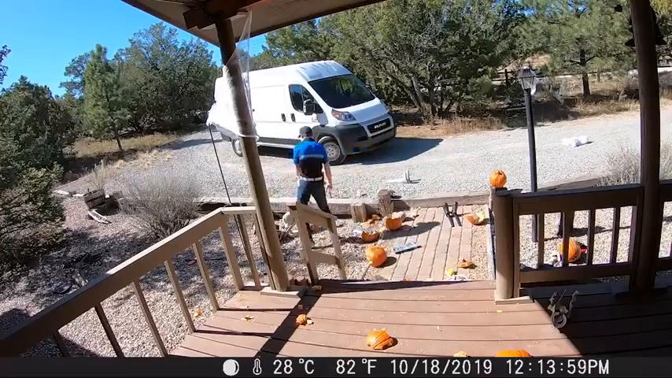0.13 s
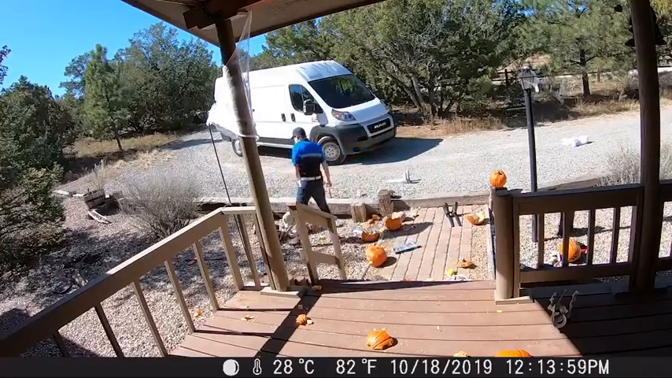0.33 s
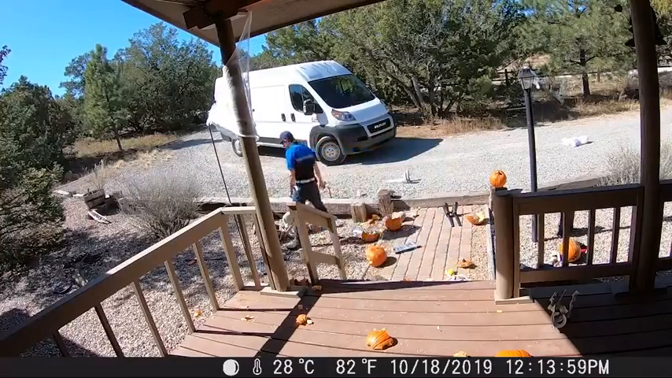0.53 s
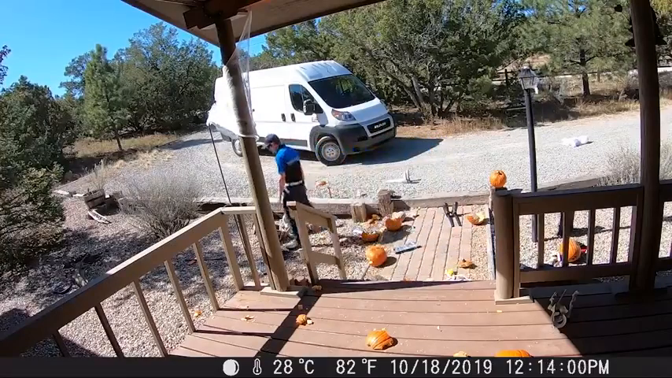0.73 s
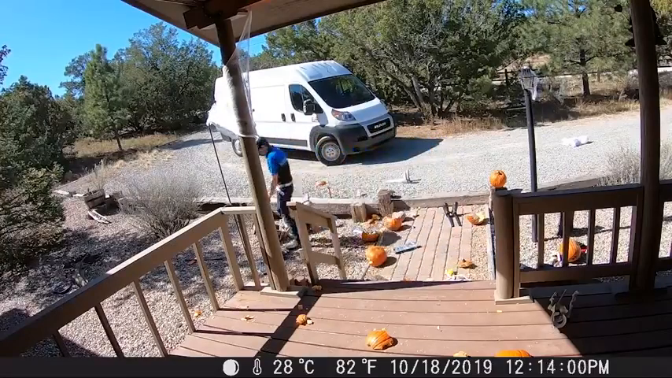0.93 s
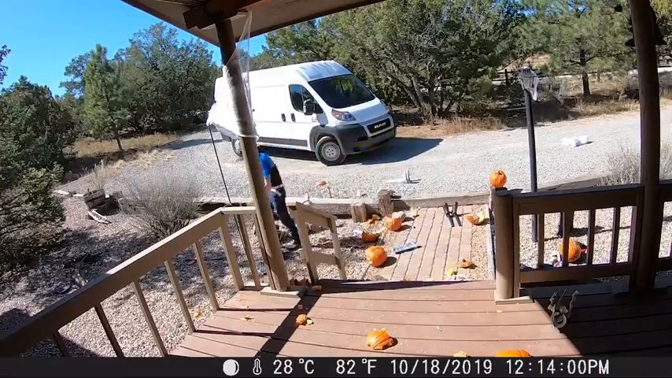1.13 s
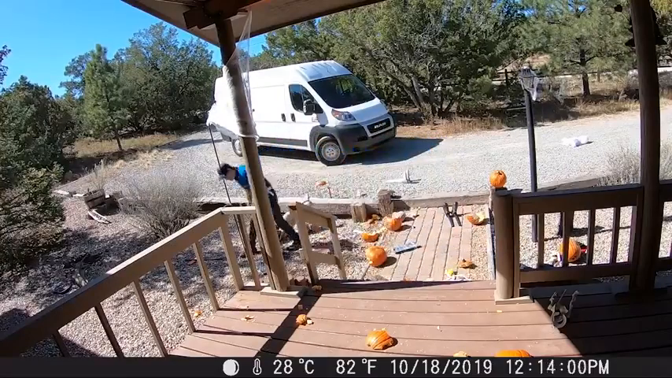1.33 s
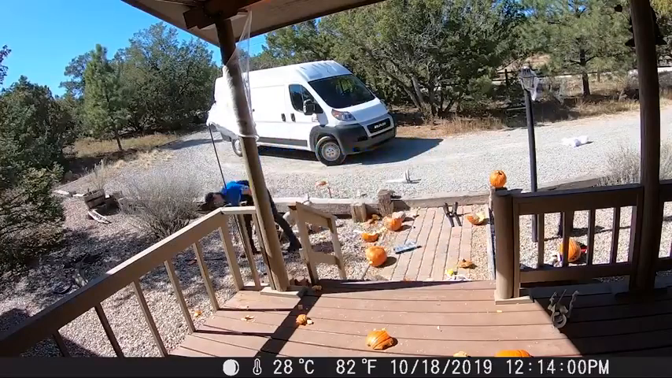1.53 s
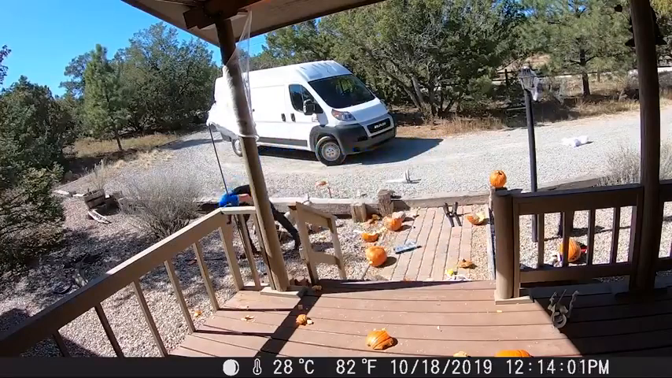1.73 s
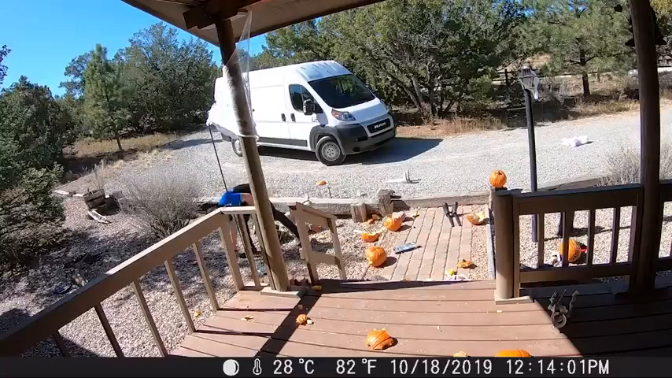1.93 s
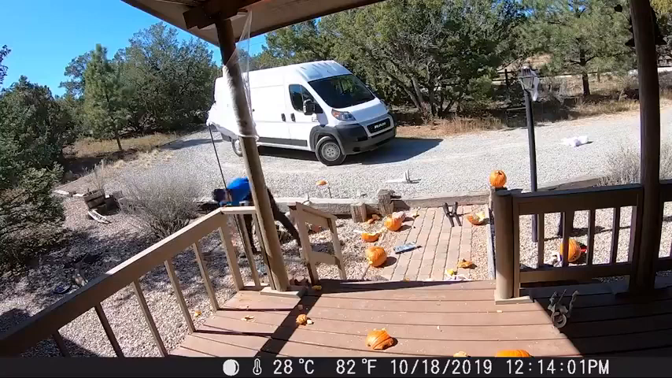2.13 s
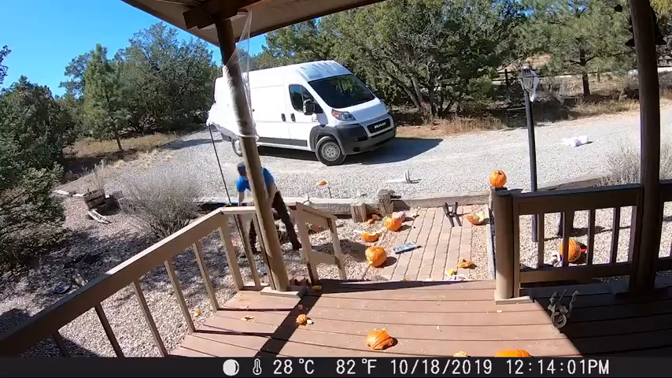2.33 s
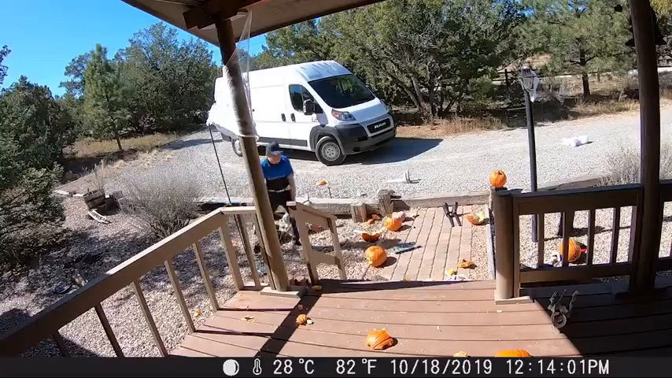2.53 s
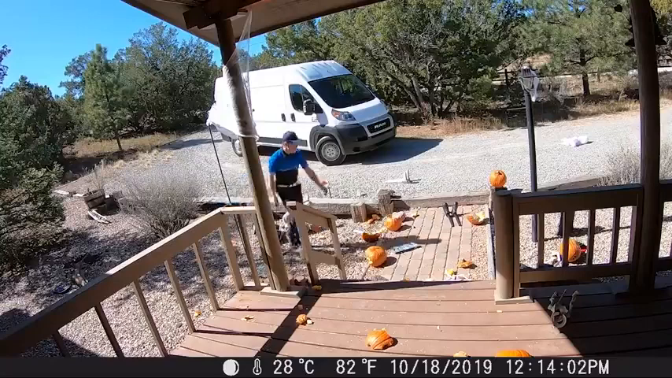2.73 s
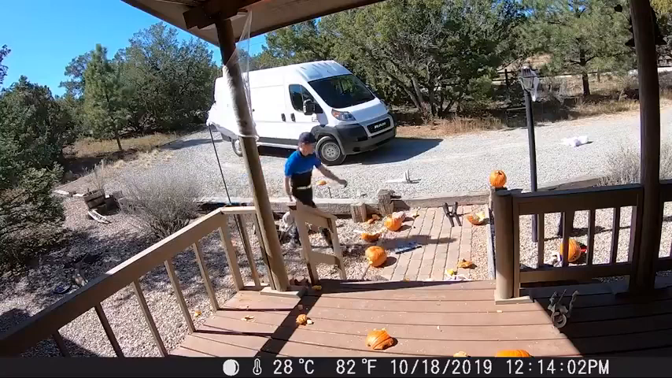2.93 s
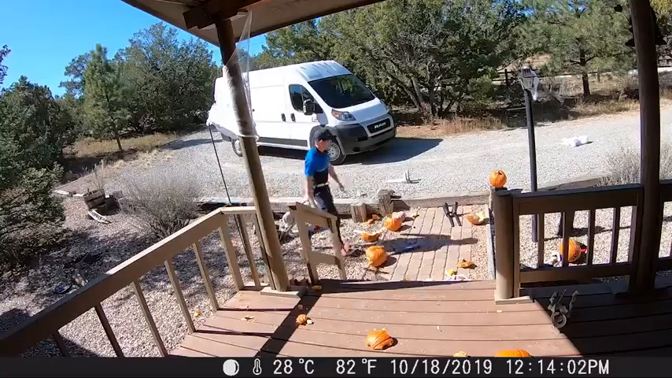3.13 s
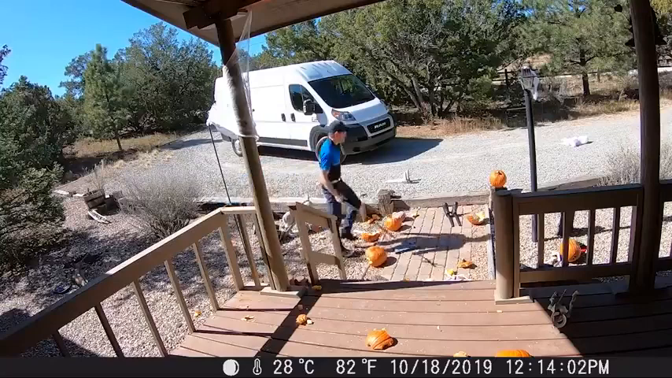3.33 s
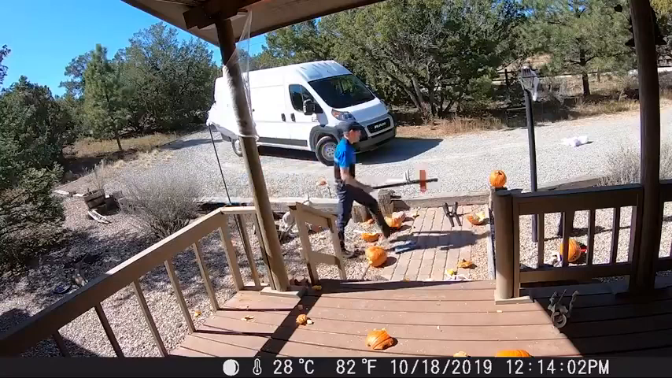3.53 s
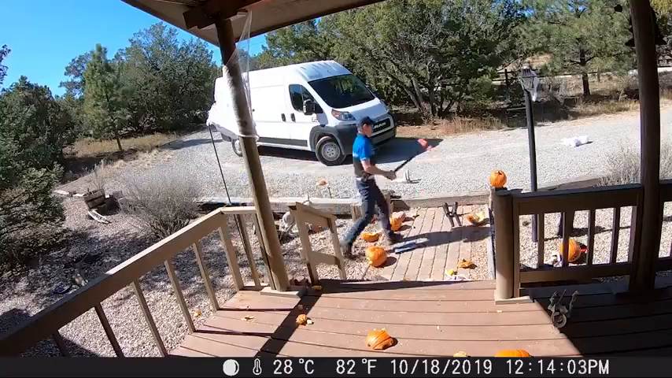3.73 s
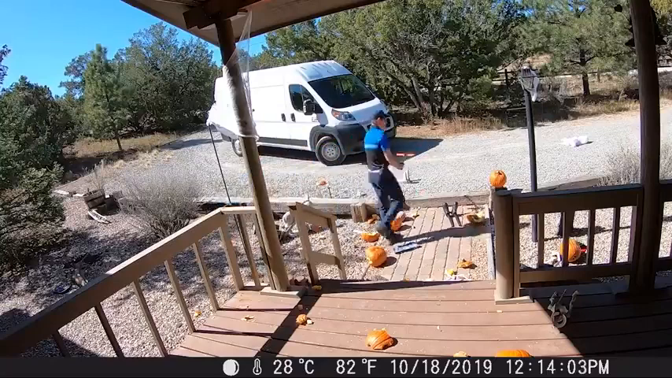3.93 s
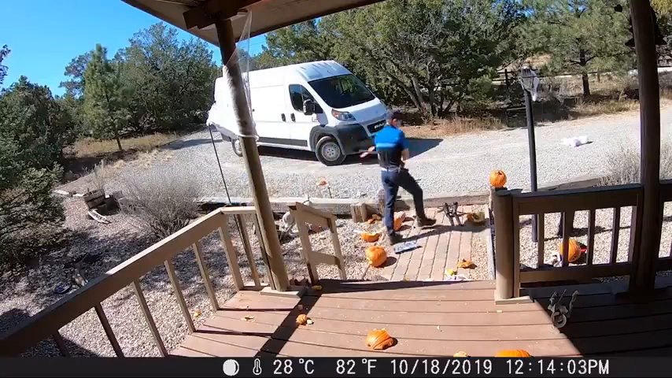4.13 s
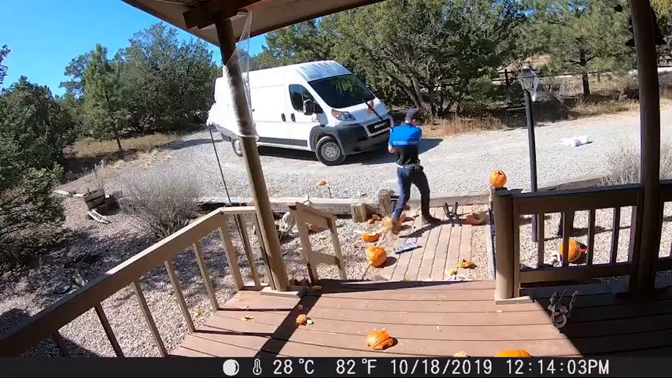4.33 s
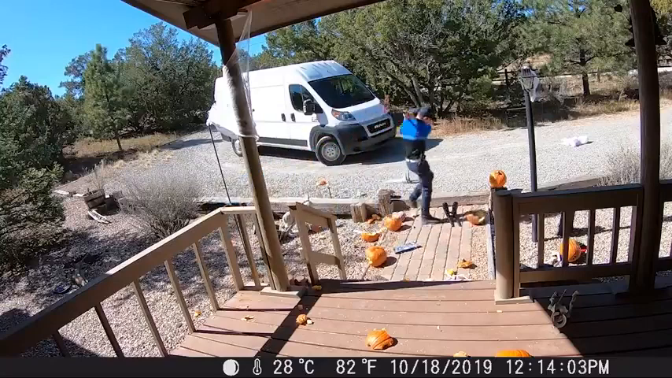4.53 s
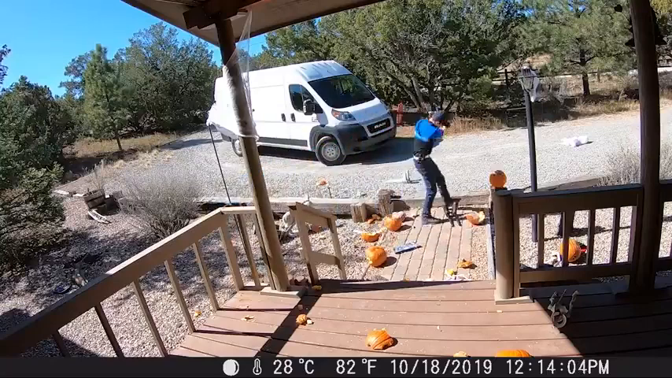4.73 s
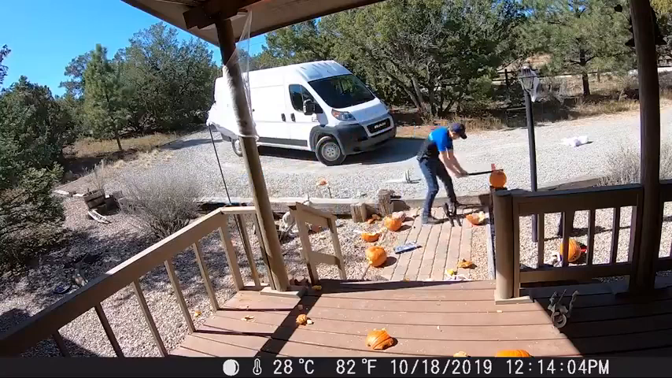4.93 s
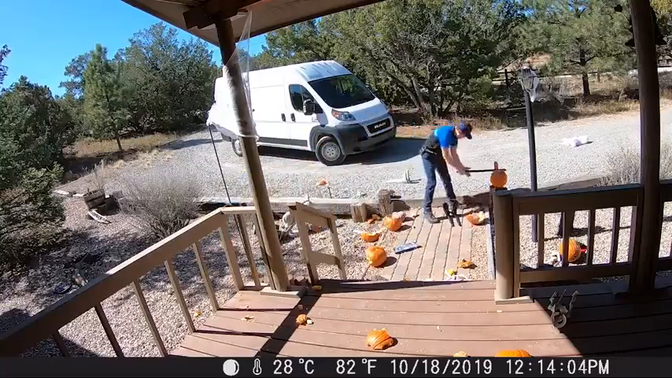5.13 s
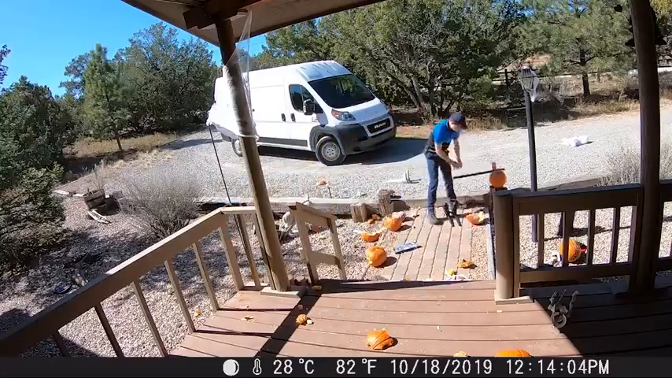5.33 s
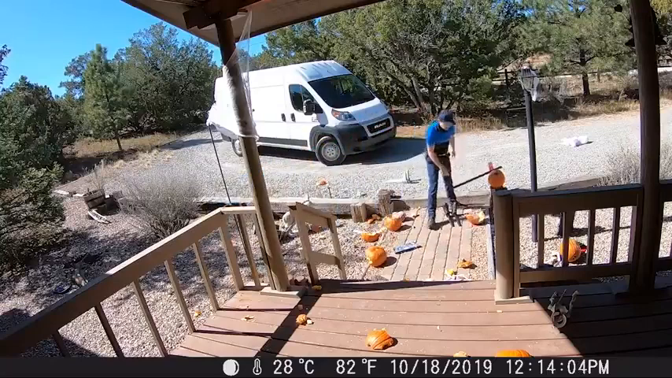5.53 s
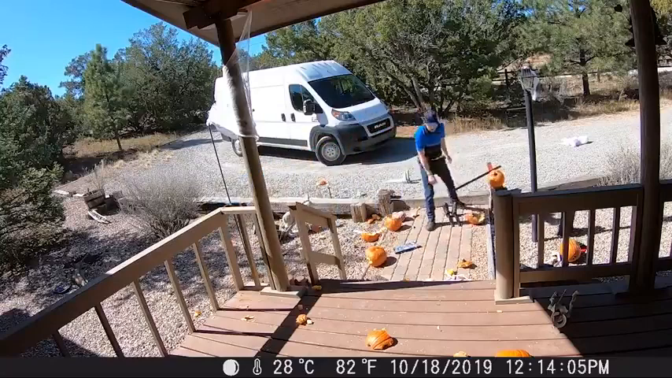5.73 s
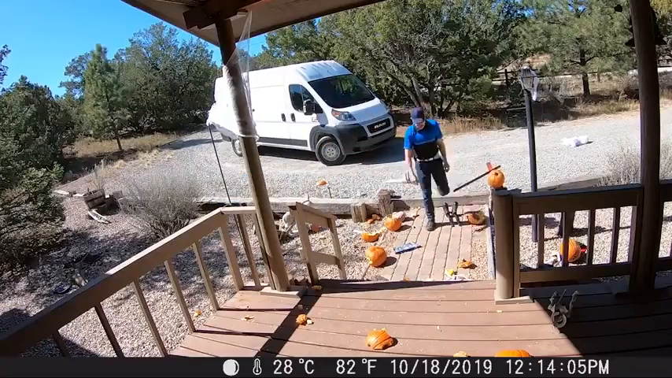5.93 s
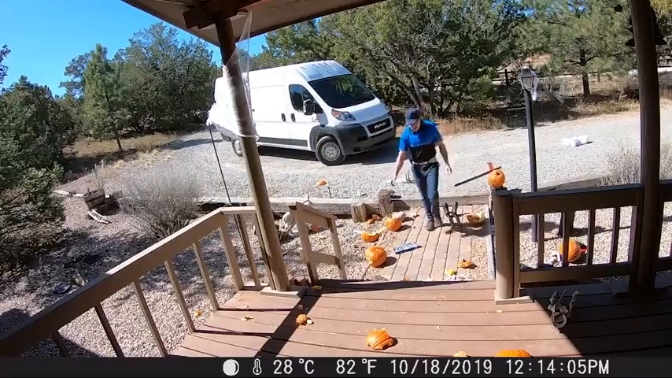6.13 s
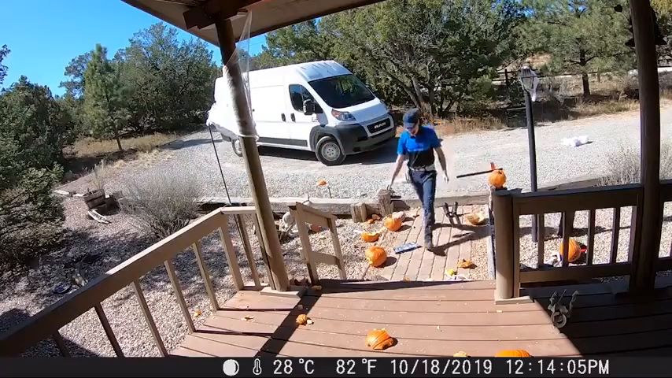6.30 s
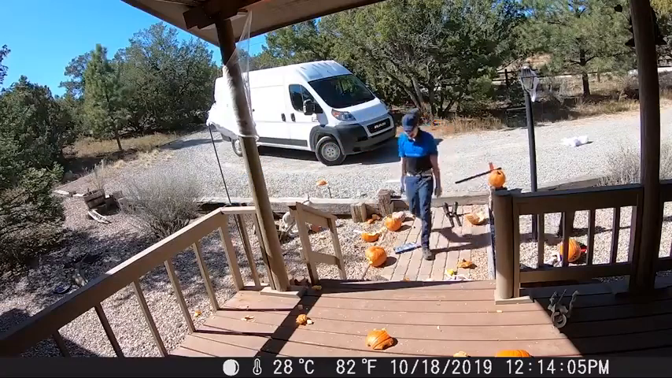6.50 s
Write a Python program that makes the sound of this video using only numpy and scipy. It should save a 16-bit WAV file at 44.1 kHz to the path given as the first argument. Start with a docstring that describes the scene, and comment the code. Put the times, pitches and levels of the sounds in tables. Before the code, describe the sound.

A fixed stereo camera microphone on a porch picks up a steady, fluttering low engine hum and soft outdoor air. Someone shuffles on gritty boards and paving: dry scuffs, stone crunches, hollow heel knocks, the strongest just before three seconds. Near five seconds a blade strikes a wooden post, a loud crack with a deep thump and short yard echo, followed by only very faint shuffling.

```python
"""A van's idle throbs nearby while gritty soles scuff, crunch and knock on boards and paving by a wooden
porch; at about 5 s a hatchet is driven into a post with one bang. Two ports pick it up in stereo.
Hum: beating sines. Air: shaped noise with resonant panels. Soles: noise grains and snapping stones.
Boards, post and blade: decaying modes; crack: shaped noise. Echo: sparse random taps."""
import sys
import numpy as np
from scipy import signal
from scipy.fft import rfft, irfft, next_fast_len
from scipy.io import wavfile
from scipy.ndimage import uniform_filter1d

SR = 44100
rng = np.random.default_rng(int(sys.argv[2]) if len(sys.argv) > 2 else 0)


def store_pcm(level_fs):
    """Save levels as 16-bit WAV."""
    pcm = np.round(np.clip(level_fs, -1, 1) * 32767).astype(np.int16)
    wavfile.write(sys.argv[1], SR, np.atleast_2d(pcm).T)


N = 289516


def amp(db):
    """Gain of a level in dB."""
    return 10 ** (np.asarray(db) / 20)


def evened(x):
    """Scales to rms 1."""
    return x / np.sqrt(np.mean(x ** 2) + 1e-20)


def read(points, hz):
    """Reads a spectrum table on a log-frequency axis."""
    f, value = np.transpose(points)
    return np.interp(np.log(hz + 1), np.log(f + 1), value)


def colour(x, points):
    """Filters by a spectrum table (frequency [Hz], gain [dB])."""
    size = next_fast_len(x.shape[-1])
    gain = amp(read(points, np.fft.rfftfreq(size, 1 / SR)))
    return irfft(rfft(x, size) * gain, size)[..., :x.shape[-1]]


def resonate(x, hz, width_hz):
    """One-pole complex resonance, gain about 1 at its centre."""
    pole = np.exp((2j * np.pi * hz - np.pi * width_hz) / SR)
    return 2 * signal.lfilter([1 - abs(pole)], [1, -pole], x).real


def add(mix, start_s, sound):
    """Lays a sound into the mix, cut at the end."""
    part = mix[..., round(start_s * SR):][..., :sound.shape[-1]]
    part += sound[..., :part.shape[-1]]


def ring(modes, seconds, weight_db=0, freedom=1):
    """Sum of dying sines after one tap, peak 1; freedom stretches the decays."""
    hz, db, t60_s = np.transpose(modes)[:, :, None]
    t = np.arange(round(seconds * SR)) / SR
    decay = amp(db + weight_db - 60 * t / (t60_s * freedom))
    out = (decay * np.sin(2 * np.pi * hz * t)).sum(0)
    return out / abs(out).max()


def damped(sound, rise_s, hold_s, left):
    """A ring swells, runs freely, then the settling weight damps it to a small share; peak 1."""
    t = np.arange(len(sound)) / SR
    swell = 1 - np.exp(-t / rise_s)
    grip = left + np.exp(-(np.maximum(t - hold_s, 0) / 0.0025) ** 2)
    out = sound * swell * grip
    return out / abs(out).max()


LOWER_ORDER_HZ, BEAT_HZ = 37.984, 4.913  # the upper order lies BEAT_HZ above the lower
UPPER_DB, OUTER_DB = -0.5, -26  # orders against the lower one
IN_STEP_S = 0.14  # orders align here, before lateness
HUM_LEFT_DB, HUM_LEFT_LAG_CYCLES = -13, 0.32
# lower engine order at the right port: (time [s], peak level [dB])
HUM_LEVEL = [(0.13, -34.5), (0.32, -49), (0.52, -29), (0.74, -30), (1.05, -36.5), (1.36, -31.5),
             (1.56, -39.5), (1.77, -30), (1.96, -43), (2.16, -34), (2.56, -34.5), (2.78, -31),
             (2.97, -27.5), (3.37, -45.5), (3.58, -33), (3.9, -38.5), (4.18, -30.5), (4.6, -40.5),
             (4.8, -35), (5.2, -35), (5.41, -31), (5.63, -34.5), (6.03, -42.5), (6.44, -31)]
# hunting idle shifts the throb: (time [s], lateness [ms])
THROB_LATE = [(0.05, 31), (0.4, -26), (1.25, 0), (1.5, 12), (2.04, -15), (2.44, -22), (2.85, -18),
              (3.3, -8), (3.73, 8), (4.06, -53), (4.3, -1), (5.2, -21), (5.55, 8), (6.35, -22)]


def idle():
    """Two close engine orders, with a weak one on either side, beat about five times a second."""
    t = np.arange(N) / SR
    late_s = np.interp(t, *np.transpose(THROB_LATE)) / 1e3
    beat = np.exp(2j * np.pi * BEAT_HZ * (t - IN_STEP_S - late_s))
    orders = 1 + amp(UPPER_DB) * beat + amp(OUTER_DB) * (1 / beat + beat ** 2)
    swing = amp(np.interp(t, *np.transpose(HUM_LEVEL))) * orders
    left_port = amp(HUM_LEFT_DB) * np.exp(-2j * np.pi * HUM_LEFT_LAG_CYCLES)
    ports = np.array([[left_port], [1]])
    hum = (ports * swing * np.exp(2j * np.pi * LOWER_ORDER_HZ * t)).imag
    throb = abs(swing) / abs(swing).max()
    return hum, throb


AIR_MID_DB, AIR_SIDE_DB = -55.5, -57  # wash rms
# engine wash and outdoor air, sum of ports: (frequency [Hz], relative density [dB per Hz])
AIR_MID = [(38, -63), (65, -33), (103, -5.5), (182, 2.5), (204, 1.5), (309, 1), (338, -18), (511, -9.5),
           (688, -15), (771, -9.5), (970, -31), (1280, -15), (1720, -14.5), (7450, -34), (11000, -47),
           (15500, -75)]
# the same, difference of ports: (frequency [Hz], relative density [dB per Hz])
AIR_SIDE = [(38, -64), (65, -18), (86, -15.5), (182, -13), (371, -15.5), (416, -19), (455, -29),
            (672, -17.5), (771, -24.5), (1340, -25), (3750, -43.5), (6640, -45), (11000, -53), (15500, -78)]
# panels shaken by the engine: (frequency [Hz], width [Hz], level in the sum before throb [dB])
DRONES = [(28.3, 11.7, -53.5), (60.3, 9.5, -54.5), (84, 15, -65.5), (173.3, 3.1, -59), (223.3, 7.1, -75.5),
          (302, 1.8, -63), (471, 16, -63.5), (522.4, 8.5, -67.5)]


def air(throb):
    """Noise wash, patchy in time and pitch; the noise-driven panel resonances breathe with the engine."""
    frames, hz = N // 256 + 5, np.fft.rfftfreq(1024, 1 / SR)
    re, im = rng.standard_normal((frames, 513, 2, 2)).T
    patches = uniform_filter1d(rng.standard_normal((frames, 513)).T, 10, 0)
    patches = evened(uniform_filter1d(patches, 14, 1))
    gusts = evened(uniform_filter1d(rng.standard_normal(frames), 40))
    density_db = np.array([read(AIR_MID, hz), read(AIR_SIDE, hz)])[..., None]
    spectrum = (re + 1j * im) * amp(density_db + 1.7 * patches + 0.7 * gusts)
    mid, side = signal.istft(spectrum, nperseg=1024, noverlap=768)[1][:, :N]
    out = np.array([amp(AIR_MID_DB) * evened(mid), amp(AIR_SIDE_DB) * evened(side)])
    for f, width_hz, db in DRONES:
        panel = evened(resonate(rng.standard_normal((2, N)), f, width_hz))
        out += amp([[db], [db - 3.5]]) * panel * (0.59 + 0.5 * throb)
    return out


SLIDE_S, SLIDE_DB = 6.41, -67
# faint rasp of a sliding sole: (frequency [Hz], width [Hz], relative level [dB])
SLIDE = [(1390, 100, 3), (1750, 260, 2), (2110, 130, 3.5), (2520, 380, -3.5), (3300, 440, -9)]


def slide():
    """A sole slides near the end: noise through a few bands, swelling in."""
    t = np.arange(N - round(SLIDE_S * SR)) / SR
    rub = rng.standard_normal((2, len(t)))
    bands = 0
    for hz, width_hz, db in SLIDE:
        twice = resonate(resonate(rub, hz, width_hz), hz, width_hz)
        bands = bands + amp(db) * evened(twice)
    out = np.zeros((2, N))
    add(out, SLIDE_S, amp(SLIDE_DB) * bands * np.minimum(t / 0.049, 1))
    return out


def stones(per_s, cycles, count):
    """Small stones of many sizes snap at random moments, each ringing a few cycles at its own pitch."""
    out, t = np.zeros((2, N)), np.arange(600) / SR
    for hz in np.geomspace(900, 12000, count):
        strength = amp(3.4 * np.minimum(rng.exponential(1, N), 4))
        snaps = strength * (rng.random(N) < per_s / count / SR)
        phase = [[0], [2 * np.pi * rng.random()]]
        tone = np.exp(-t * hz / cycles) * np.sin(2 * np.pi * hz * t + phase)
        out += signal.oaconvolve(snaps[None], tone * hz / 3000, axes=1)[:, :N]
    return evened(out)


# colour of grit, for scuffs and crunches: (frequency [Hz], relative density [dB per Hz])
GRIT = [(530, 5.5), (900, -25), (1200, 1), (1500, -13), (1800, -3.5), (1950, -1.5), (2540, -4.5),
        (4390, -6.5), (6120, 8.5), (7150, 8.5), (9500, -5), (15500, -17)]
# dragging soles: (peak time [s], fine fizz level [dB], rise over 20 dB [s], fall over 20 dB [s],
# coarse rasp over fizz [dB], board rumble over fizz [dB])
SCUFFS = [(0.005, -52.5, 0.068, 0.15, -11, 0), (0.198, -61.5, 0.0074, 0.17, -8, -5),
          (0.42, -73, 0.024, 0.021, 9, -15), (0.645, -49, 0.031, 0.14, -3, 8),
          (0.92, -67, 0.42, 0.29, 3, 5.5), (1.36, -66.5, 0.25, 0.18, 3.5, 11),
          (1.426, -51, 0.041, 0.24, 0, 4), (1.51, -53.5, 0.19, 0.22, -11, 1.5),
          (1.68, -64, 0.039, 0.21, -10, 4.5), (1.753, -55.5, 0.027, 0.13, -1, 9),
          (1.97, -58, 0.19, 0.083, 0, 4.5), (2.07, -61.5, 0.11, 0.049, 5.5, 7.5),
          (2.14, -63, 0.064, 0.27, 8.5, 7.5), (2.374, -49, 0.048, 0.13, -2, 3),
          (2.598, -47, 0.091, 0.084, -12, -6.5), (2.73, -56, 0.027, 0.034, -17, -17),
          (2.825, -48, 0.031, 0.07, -3, 10), (3.0, -54.5, 0.54, 0.21, -24, 8),
          (2.86, -66, 0.037, 0.048, -4, 12), (3.179, -49, 0.083, 0.019, -14, 4.5),
          (3.103, -40, 0.12, 0.15, -22, 2.5), (3.43, -55, 0.46, 0.15, -4.5, 5),
          (3.579, -42.5, 0.064, 0.055, -19, 5), (3.782, -46, 0.17, 0.17, -18, 5.5),
          (4.05, -66.5, 0.68, 1, -4.5, 8), (4.32, -61.5, 0.083, 0.11, 2, 13.5),
          (4.403, -45.5, 0.089, 0.068, -7, 7), (4.52, -64, 0.065, 0.26, -3.5, 2),
          (5.886, -73.5, 0.21, 0.15, 6, 12), (6.236, -71.5, 0.072, 0.027, -1, 12.5),
          (6.5, -81, 0.083, .6, 16, 22.5)]


def scuffs():
    """Dense grains of grit under the sole: they fizz, rasp and rumble the boards, each with uneven grip."""
    t = np.arange(N) / SR
    sizes = (300, 500, 500, 900)
    grip = [evened(uniform_filter1d(rng.standard_normal(N), size)) for size in sizes]
    grains = rng.standard_normal((2, N)) + 0.53 * stones(1200, 5.3, count=30)
    grit = colour(grains, GRIT)
    above = signal.butter(4, 4700, "high", fs=SR, output="sos")
    below = signal.butter(4, 4700, fs=SR, output="sos")
    fizz = signal.sosfilt(above, grit) * amp(0.92 * grip[0] + 1.04 * grip[1])
    rasp = signal.sosfilt(below, grit) * amp(1.4 * grip[0] + 2.3 * grip[2])
    shaking = grains * amp(1.3 * grip[3])
    rumble = sum(amp(db) * resonate(shaking, hz, 53) for hz, db, _ in DECK[2:])
    power = np.zeros((3, N))
    for s, db, rise_s, fall_s, rasp_db, rumble_db in SCUFFS:
        drag_db = db - 20 * np.maximum((s - t) / rise_s, (t - s) / fall_s)
        power += amp([[0], [rasp_db], [rumble_db]]) ** 2 * amp(drag_db) ** 2
    return sum(np.sqrt(p) * evened(layer) for p, layer in zip(power, (fizz, rasp, rumble)))


# single crunches under a sole: (time [s], peak level [dB], pitch of the loudest stone [Hz],
# its share [dB], t60 [s], brightness [dB per octave])
CRUNCHES = [(0.627, -36.5, 5770, -3, .1, -5), (0.64, -39, 1500, 7, 0.14, -13),
            (0.858, -47, 6150, 0, 0.084, -4), (0.8853, -45.5, 6200, 6, .1, -6),
            (1.413, -42.5, 3660, 9, .1, -8), (1.677, -40, 6400, -4, 0.18, -11),
            (1.749, -45, 2310, 1, 0.056, -3), (1.7676, -33.5, 3600, -15, .06, -5.5),
            (1.979, -45.5, 1760, 1, 0.12, 1), (2.042, -47, 2100, 6, .08, -4),
            (2.065, -49, 4200, 2, .05, -4), (2.113, -40.5, 6300, 0, 0.045, -8),
            (2.1432, -40, 2530, 2, 0.088, -6), (2.238, -43, 2330, -2, 0.055, -4),
            (2.315, -44, 2380, -4, 0.066, -4), (2.3341, -32.5, 2370, -8.5, 0.11, -4.5),
            (2.5389, -37.5, 6300, -27, 0.088, -7.5), (2.731, -38, 6600, 11, 0.055, -7),
            (2.781, -30.5, 3200, -8.5, 0.16, -3.5), (2.8232, -29.5, 6160, -5, 0.13, -11),
            (2.842, -30, 3980, -8.5, 0.037, -9), (1.489, -46, 3000, -2, 0.061, -3),
            (1.529, -52, 6500, 0, .05, 3), (3.09, -39, 2500, -2, .05, 5),
            (2.911, -31.5, 6600, -14, 0.12, -9), (2.96, -36, 6270, -7, 0.096, -8.5),
            (3.018, -38.5, 6200, 10, 0.052, -5), (3.049, -31, 6560, -14, 0.19, -2),
            (3.118, -30, 6100, 4, 0.04, -13), (3.163, -34.5, 7100, -9, 0.16, 16),
            (3.334, -45, 6300, 12, 0.1, 6), (3.494, -34, 5900, -11, 0.082, -7),
            (3.5506, -33.5, 2820, -9, 0.052, 0), (3.573, -28.5, 6230, -3, 0.049, 4),
            (3.692, -40, 6300, -13, .1, -6), (3.779, -30.5, 2180, -6, 0.12, -3),
            (4.003, -42, 2240, 6, 0.079, -11), (4.127, -40, 1900, -12, 0.11, -10),
            (4.4, -34, 1840, -7, 0.23, 15)]


def crunches():
    """Grit gives way in short, grainy, dying noise bursts, with one stone resonating in each."""
    out, t = np.zeros((2, N)), np.arange(SR // 5) / SR
    for s, db, hz, stone_db, t60_s, tilt_db in CRUNCHES:
        burst = rng.standard_normal((2, len(t))) * amp(-60 * t / t60_s) * np.minimum(t / 0.0022, 1)
        grain = evened(uniform_filter1d(rng.standard_normal(len(t)), size=90))
        burst = burst * amp(2.25 * grain)
        tilt = [(1000, -2 * tilt_db), (16000, 2 * tilt_db)]  # four octaves
        spray = evened(colour(colour(burst, GRIT), tilt))
        crunch = spray + amp(stone_db) * evened(resonate(burst, hz, 0.13 * hz))
        add(out, s, amp(db) * crunch / abs(crunch).max())
    return out


OWN_DB, OWN_T60_S = 9, 0.32  # own note of the struck board, before damping
# deck modes, also rumbled by the scuffs: (frequency [Hz], relative level [dB], undamped t60 [s])
DECK = [(72.5, -14, 0.067), (106, 19, 0.18), (134, 4, 0.48), (162, -5, 0.21), (230, 2.5, 0.4),
        (257, 10.5, 0.32), (321, 14, 0.18), (373, -4.5, 0.036), (390, 7.5, 0.19), (412, 3.5, 0.74),
        (478, 1, 0.11), (590, -10, 0.12), (672, 10.5, 0.049), (745, 4.5, 0.27), (907, -13, 0.095),
        (1040, -20, 0.11)]


def board(hz, db_per_octave, rise_s, hold_s):
    """One board's own note and the deck modes around it, weaker with distance in pitch."""
    modes = DECK + [(hz, OWN_DB, OWN_T60_S)]
    near_db = -db_per_octave * abs(np.log2(np.transpose(modes)[0] / hz))[:, None]
    return damped(ring(modes, 0.42, near_db), rise_s, hold_s, 0.071)


# heels and toes on boards: (time [s], board peak level [dB], board pitch [Hz], free ring [s],
# clack pitch [Hz], clack over board [dB], thud over board [dB])
KNOCKS = [(0.629, -44, 370, 0.015, 685, 0.5, -6), (0.66, -39, 703, 0.014, 420, -13, -6),
          (1.412, -39.5, 426, 0.032, 754, -9, -11), (1.75, -34, 349, 0.035, 685, -14, -15),
          (1.7685, -39, 565, 0.014, 700, 5, -18), (1.973, -43.5, 880, 0.013, 870, -24, -26),
          (2.143, -54, 566, 0.022, 890, 5, -11), (2.394, -35.5, 339, 0.016, 807, -10, -7.5),
          (2.583, -35.5, 346, 0.027, 726, -25, -4.5), (2.742, -60, 397, .02, 690, -12, -6),
          (2.782, -23, 382.3, 0.022, 739, -12.5, -16), (2.825, -28.5, 706, 0.024, 300, 0.5, -1),
          (2.829, -25.5, 146, 0.0089, 1100, -18, -12), (2.917, -33.5, 427, 0.023, 733, -4, -5),
          (2.989, -38, 414, 0.03, 723, -7, -17), (3.018, -29.5, 416, 0.038, 990, -8, -13),
          (3.028, -36.5, 1093, 0.011, 703, 0, -9), (3.079, -37, 264, 0.03, 624, -15, -18),
          (3.113, -32.5, 329, 0.018, 747, -3, -15), (3.145, -38, 279, 0.012, 1140, -5, -18),
          (3.172, -41.5, 335, 0.021, 848, -5, -0.5), (3.553, -43, 394, 0.023, 784, 7, -12),
          (3.566, -33.5, 331, 0.035, 786, -2, -32), (3.707, -40.5, 373, 0.027, 649, -1, -58),
          (3.781, -32, 348, 0.019, 677, -2.5, -16), (3.819, -43, 290, 0.014, 704, 2, -1),
          (4.129, -44.5, 346, 0.042, 650, -10, -19.5), (4.311, -35.5, 357, 0.032, 680, -23, -23),
          (4.364, -32, 357, 0.014, 755, -28, -12), (4.375, -33, 385, 0.014, 1184, -9, -15),
          (4.399, -32, 277, 0.037, 695, -25, -7.5), (4.894, -37, 339, 0.036, 624, -17, -2),
          (4.952, -36.5, 440, 0.018, 640, -18, -6), (6.436, -47.5, 244, 0.02, 680, -22, 4.5)]


def steps():
    """Each step rings its board, a broader clack of deck modes at its own pitch, and the joists as a thud."""
    out, thud = np.zeros(N), board(152.2, 28.5, 0.0023, 0.022)
    for s, db, hz, hold_s, clack_hz, clack_db, thud_db in KNOCKS:
        knock = board(hz, 65, 0.00056, hold_s)
        clack = board(clack_hz, 14.0, 0.00054, hold_s)
        add(out, s, amp(db) * (knock + amp(clack_db) * clack))
        add(out, s, amp(db + thud_db) * thud)
    return out


# strike, bite, jolt and rebound of the hatchet: (time [s], blade level [dB], crack level [dB],
# crack t60 [s], thump level [dB], blade decay factor [ratio], free ring of post [s],
# pitch around which the post is struck [Hz], fall of its other modes [dB per octave])
BLOWS = [(5.028, -23, -14, 0.055, -18.5, 0.43, 0.027, 252, 4.5),
         (5.037, -32, -25.5, 0.15, -10.5, .4, 0.023, 260, 3.5),
         (5.068, -57, -43, 0.056, -23.5, 0.72, 0.026, 140, 7),
         (5.098, -57, -53, 0.07, -26, 0.72, 0.0267, 249, 24),
         (5.129, -27, -36, 0.032, -31, 0.93, 0.02, 207, 30)]
# blade modes: (frequency [Hz], relative level [dB], t60 before the decay factor [s])
BLADE = [(1420, -8, 0.055), (2444, 11, 0.078), (2700, 3, .05), (2930, 9, 0.03), (3220, 7, .022),
         (3630, 9, 0.035), (4730, 2, 0.03)]
# wood crack: (frequency [Hz], relative density [dB per Hz])
CRACK = [(410, -38), (700, -15), (950, -12), (1150, -9), (1400, 1), (1760, -8), (2490, -3.5), (3600, -16),
         (4300, -14), (4890, -9), (5700, -8), (7600, -14), (15500, -44)]
# railing post modes: (frequency [Hz], relative level [dB], undamped t60 [s])
POST = [(72, -11, 0.22), (104, -9, 0.14), (139.8, 3, 0.24), (174, -17, 0.15), (214, -4, 0.26),
        (254.6, 4.5, 0.18), (355, 7.5, 0.064), (417, -17, 0.095), (492, -2.5, 0.13), (616, -7, 0.045),
        (745, -7.5, 0.053), (1046, -13.5, 0.15), (1115, -19, 0.071)]


def hatchet():
    """A sharp crack while the heavy post starts to ring more slowly; apart from them, the thin blade ring."""
    wood, steel, t = np.zeros(N), np.zeros(N), np.arange(SR // 5) / SR
    onset = np.minimum(t / 0.0025, 1)
    for s, blade_db, crack_db, t60_s, thump_db, freedom, hold_s, post_hz, focus_db in BLOWS:
        crack = colour(rng.standard_normal(len(t)), CRACK) * amp(-60 * t / t60_s)
        near_db = -focus_db * abs(np.log2(np.transpose(POST)[0] / post_hz))[:, None]
        thump = damped(ring(POST, .4, near_db), 0.0055, hold_s, 0.051)
        add(wood, s, onset * amp(crack_db) * crack / abs(crack).max())
        add(wood, s, amp(thump_db) * thump)
        add(steel, s, onset * amp(blade_db) * ring(BLADE, len(t) / SR, freedom=freedom))
    return wood, steel


def smear(x):
    """Short random decaying noise filter: a blurred copy for the difference, giving stereo width."""
    taps = rng.standard_normal(400) * amp(-30 * np.arange(400) / 400)
    return signal.oaconvolve(x, taps / np.linalg.norm(taps))[:N]


# echo of porch and yard: (frequency [Hz], t60 [s])
YARD = [(100, 0.19), (500, 0.39), (2000, 0.21), (8000, 0.46)]


def yard(x):
    """Sparse echoes of random sign, each band dying at its own speed; separate sum and difference tails."""
    taps = np.zeros((2, SR // 2))
    slots = np.arange(200, SR // 2 - 20, 20)
    at = slots + rng.integers(0, 20, (2, len(slots)))
    np.put_along_axis(taps, at, rng.choice([-1., 1.], at.shape), 1)
    hz, t, z = signal.stft(taps, SR, nperseg=256)
    tail = signal.istft(z * amp(-60 * t / read(YARD, hz)[:, None]), SR, nperseg=256)[1]
    return signal.fftconvolve(x, tail / np.linalg.norm(tail[0]), axes=1)[:, :N]


STEEL_ECHO_DB, FEET_ECHO_DB = -16, -9.5
# share of the wood blows thrown back: (frequency [Hz], gain [dB])
POST_ECHO = [(150, -7), (500, -10), (1500, -2.5), (6000, -11.5)]
# sum of ports, weaker around 1 kHz, fuller near 3.8 kHz: (frequency [Hz], gain [dB])
PORT_SUM = [(600, 1), (850, -2), (1040, -4), (1250, -2.5), (3800, 4), (4500, 1), (5300, -0.5)]
# difference of ports, near sounds: (frequency [Hz], gain [dB])
PORTS = [(60, 13), (99, -20), (160, -1), (270, -12), (450, -14), (620, -3), (800, -2.5), (1220, -3),
         (2010, -6.5), (3330, -4), (5500, -2.5), (9080, 0.5), (15000, -0.5)]


def scene():
    """Near sounds and their echo as sum and difference of the ports, plus air; then left and right, plus hum."""
    hum, throb = idle()
    wood, steel, knocks = (np.array([x, smear(x)]) for x in (*hatchet(), steps()))
    feet = scuffs() + crunches() + slide()
    sent = colour(wood, POST_ECHO) + amp(STEEL_ECHO_DB) * steel + amp(FEET_ECHO_DB) * (knocks + feet)
    near = wood + knocks + steel + feet + yard(sent)
    ports = np.array([colour(near[0], PORT_SUM), colour(near[1], PORTS)])
    mid, side = ports + air(throb)
    return hum + np.array([mid + side, mid - side])


EDGE_HZ = 15630
# gentle treble roll-off above 9 kHz: (frequency [Hz], gain [dB])
TREBLE = [(9000, 0.5), (12000, -4.5), (15500, -10)]


def record(dry):
    """Gentle treble roll-off above 9 kHz, then a steep band limit."""
    dull = colour(dry, TREBLE)
    band_limit = signal.firwin(1023, EDGE_HZ, window=("kaiser", 9), fs=SR)
    return signal.oaconvolve(dull, band_limit[None], "same")


dry = scene()
out = record(dry)
store_pcm(out)
```